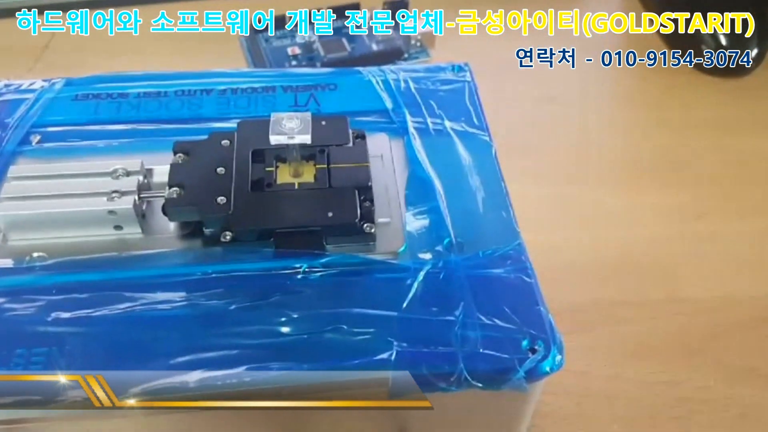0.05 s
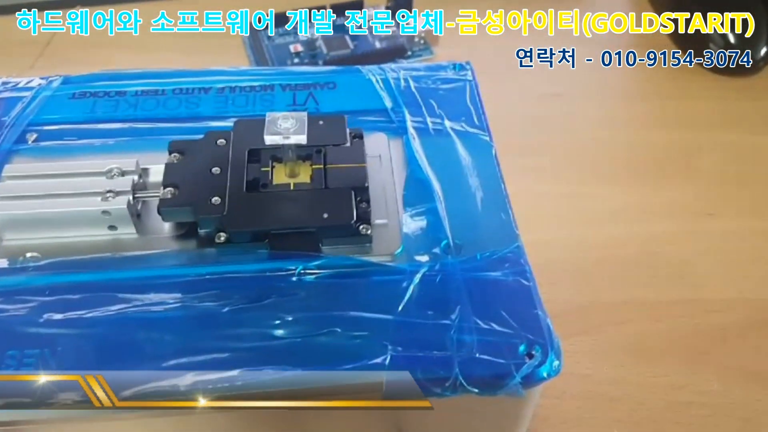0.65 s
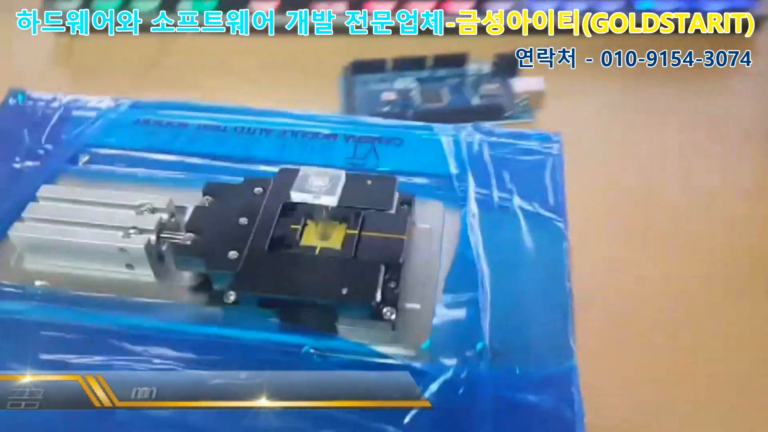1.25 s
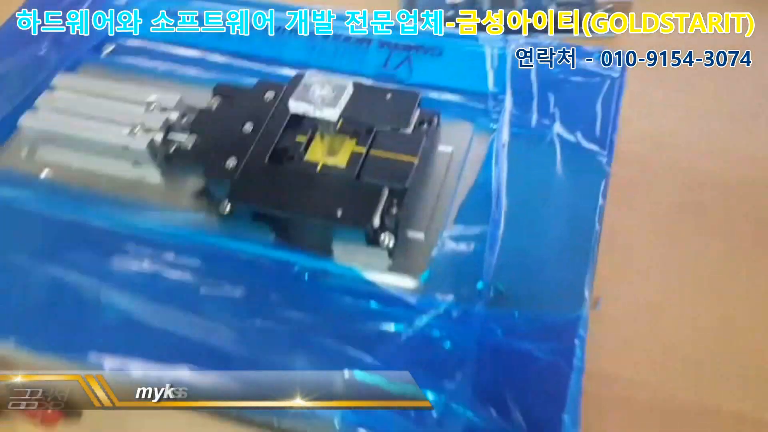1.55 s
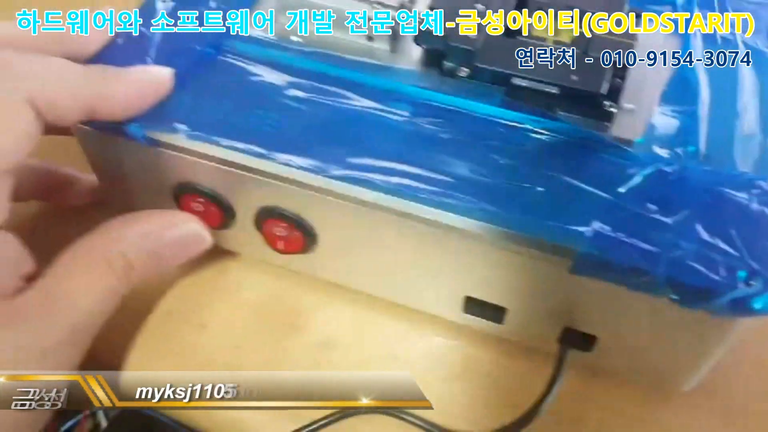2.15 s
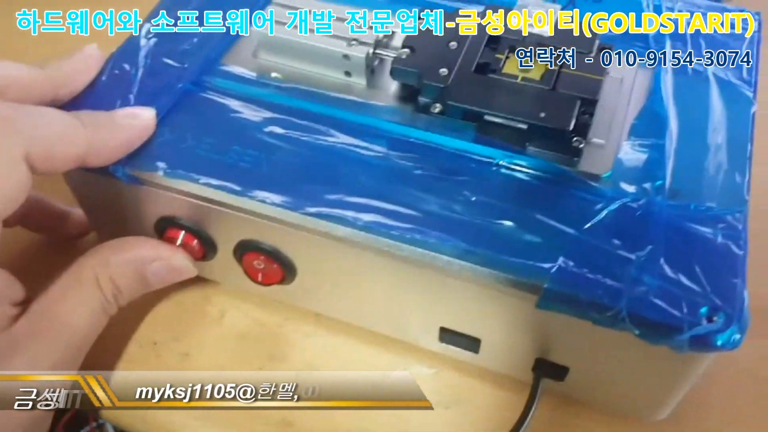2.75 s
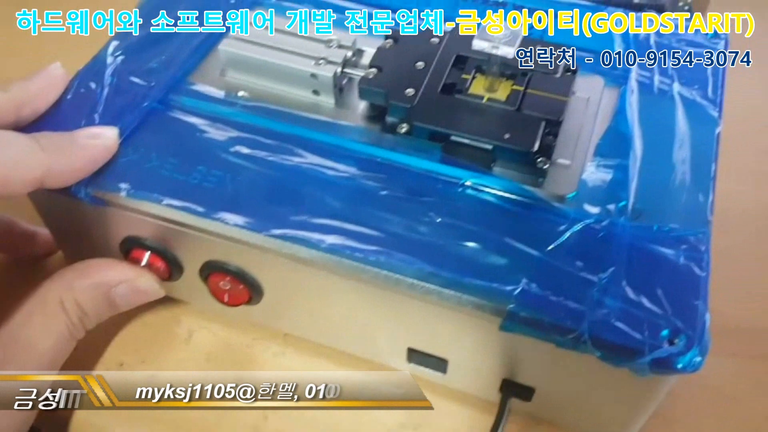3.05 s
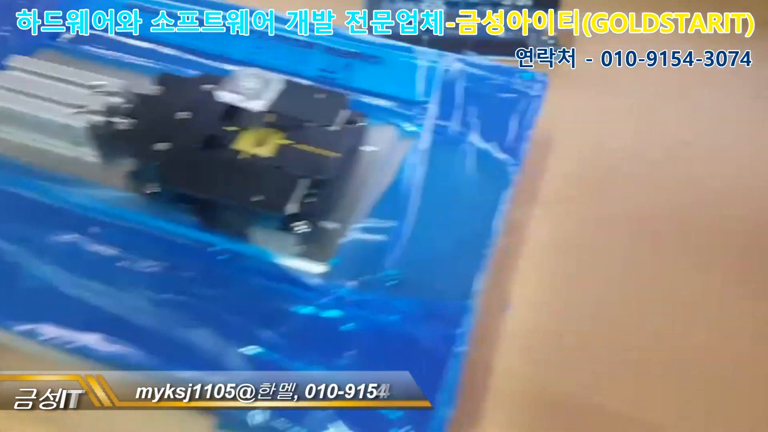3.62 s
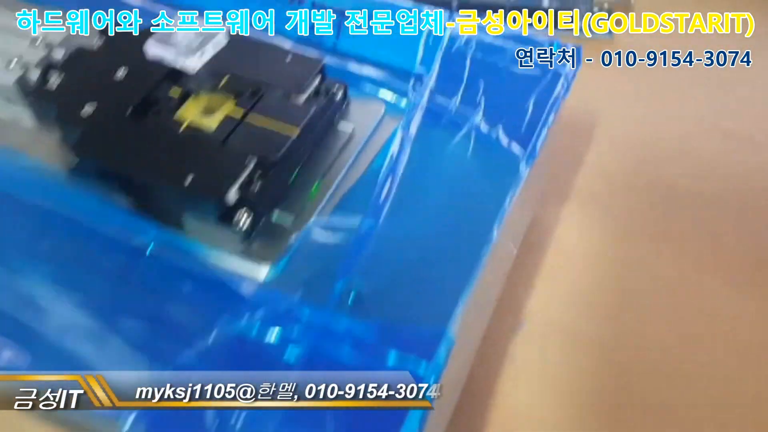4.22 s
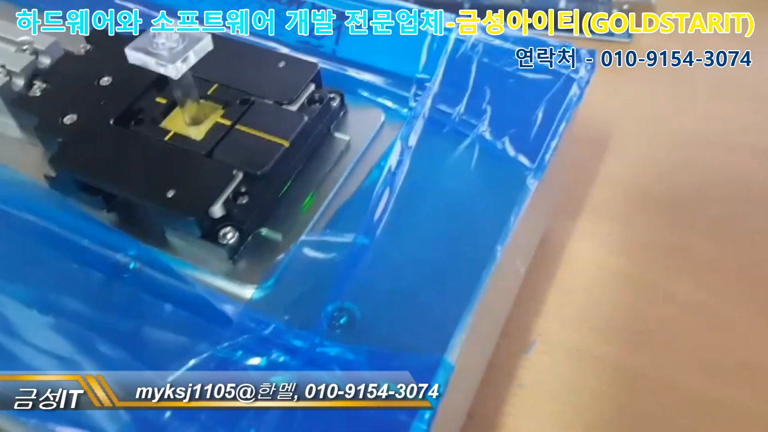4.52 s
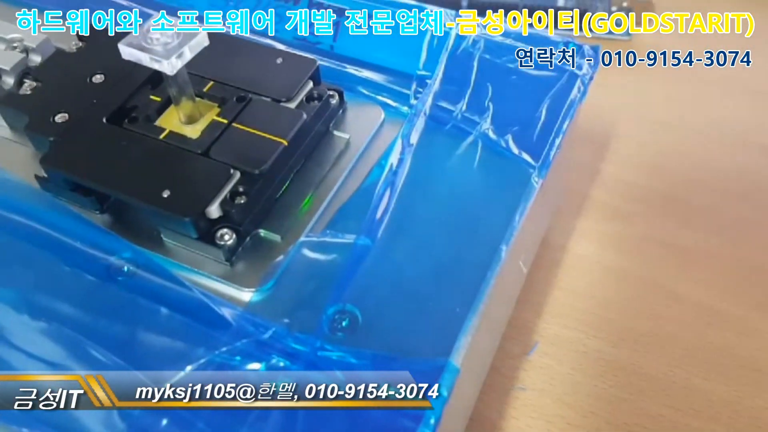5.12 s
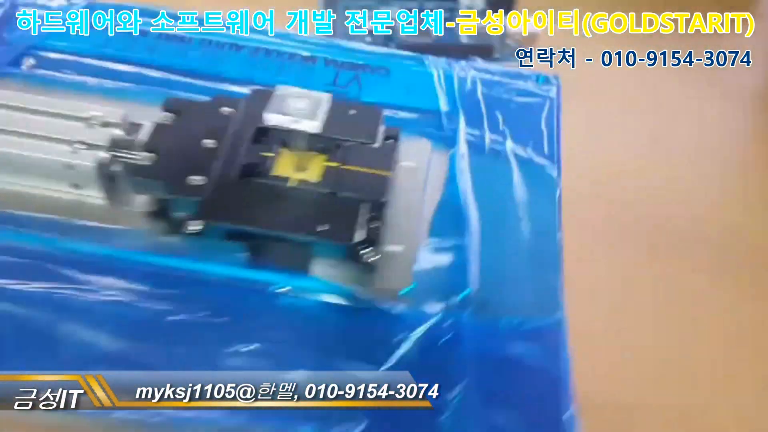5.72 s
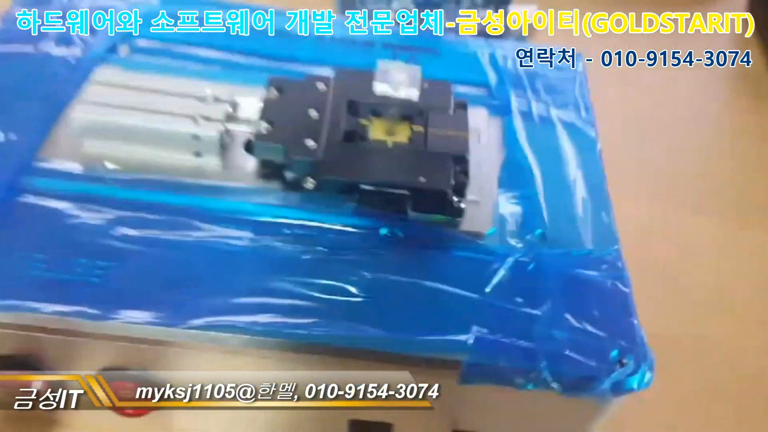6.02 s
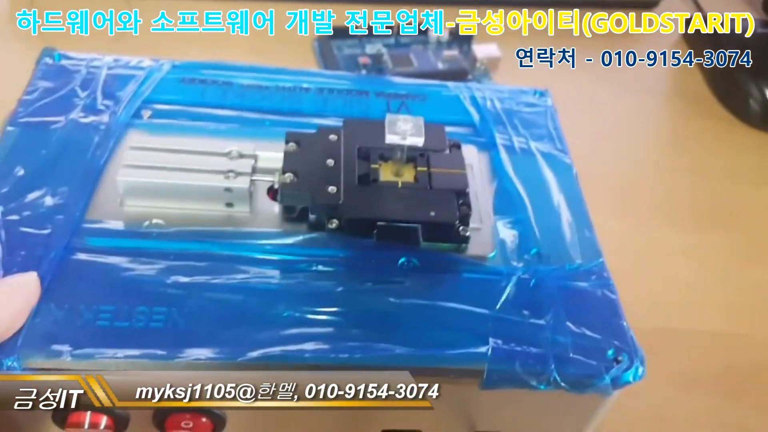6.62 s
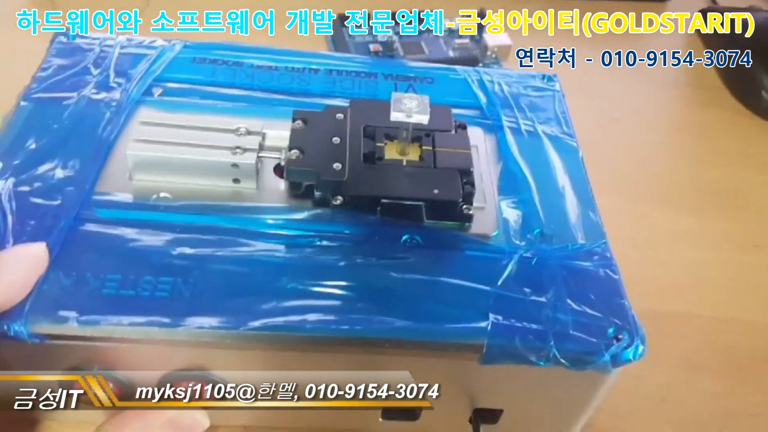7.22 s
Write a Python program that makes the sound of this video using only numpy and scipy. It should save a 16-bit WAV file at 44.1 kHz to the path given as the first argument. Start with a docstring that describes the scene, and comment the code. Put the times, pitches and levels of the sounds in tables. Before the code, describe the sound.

In a small, dry workroom with faint ventilation rumble, a machine's metal slide hits its stop three times, each a loud, close clack a few seconds apart. Between the first two, a more distant chair rasps and groans across the floor. Before the last, the chair jerks and bumps again, plastic film snaps and crinkles under a hand nearby, and the casters roll briefly to a stop.

```python
"""A sharp metallic clack, close by: an air cylinder on a small test jig slams its slide against the stop,
three times in all, and the metal rings. Between the strokes, further off, something like a chair is
dragged in rasping, groaning stick-slip jerks and then rolls on its casters. A sleeve brushes softly,
and plastic film buckles and crinkles under a hand. The workroom is small and dry, with a low
ventilation rumble."""
import sys
import numpy as np
from scipy import signal
from scipy.fft import rfft, irfft
from scipy.io import wavfile
from scipy.ndimage import uniform_filter1d

SR = 44100
rng = np.random.default_rng(int(sys.argv[2]) if len(sys.argv) > 2 else 0)


def transcribe(signal):
    """Save signal, clipped to [-1, 1], as a 16-bit WAV file at the path in sys.argv[1]."""
    frames = np.atleast_2d(signal).T
    limited = np.clip(frames, -1, 1)
    pcm = np.round(limited * 32767).astype(np.int16)
    wavfile.write(sys.argv[1], SR, pcm)


N = 328986

# how fast the chair's foot sticks and slips: (time [s], slip rate [1/s])
SLIP_RATE = [(1.78, 75), (1.85, 78), (1.91, 72), (1.97, 77.5), (2.05, 73.5), (2.1, 77), (3.8, 77),
             (3.9, 74), (3.95, 77)]


def slide_impacts(crack_db=-14, crack_t60=0.0066, rattle_db=-35, rattle_t60=0.087, rise_s=0.00054):
    """Impact excitation: the slide hits its stop and rebounds once; modes ring and loose parts chatter."""
    # strokes: (time [s], force [dB], rebound delay [s], rebound level [dB], off-centre seating [0-1],
    # crack level [dB], shelf above 9 kHz [dB], left minus right [dB])
    strokes = [(0.2299, 0.5, .0032, -9, 0.06, 6, -8, -0.5), (2.9251, 0, 0.0046, -6, 0.12, 3.5, 7.5, 0.5),
               (7.1394, 1, 0.001026, 3, 1, 1, 2, -0.5)]
    # modes of slide and case: (frequency [Hz], t60 [s], level seated squarely [dB], off centre [dB])
    jig_modes = [(140, 0.036, -38, -47.5), (225.8, 0.022, -36.5, -35.5), (329, 0.043, -32, -40),
                 (1225.5, 0.074, -32.5, -25), (1785, 0.051, -37, -32.5), (2344, 0.17, -30.5, -32),
                 (2420, 0.062, -29, -22.5), (2810, 0.023, -31.5, -23.5), (3145, .035, -21, -33),
                 (3270, .055, -17.5, -25.5), (3685, 0.021, -28, -23), (4015, .025, -17, -17.5),
                 (4108, 0.061, -16.5, -20.5), (4180, 0.021, -23, -14.5), (4830, 0.018, -13.5, -29),
                 (5523, 0.022, -10.5, -22.5), (5467, .045, -25, -34.5), (5900, 0.15, -31, -22),
                 (5840, 0.011, -20.5, -18.5), (7376, 0.034, -16, -31), (7860, 0.031, -12.5, -18.5),
                 (8623, 0.03, -21.5, -27)]
    # the metallic crack as picked up, dulled above 9 kHz by the microphone: (frequency [Hz], level [dB])
    crack_spectrum = [(25, -40), (70, -12.5), (300, -8), (600, -27.5), (1000, -16.5), (2200, -6),
                      (4500, -2.5), (6500, 3), (8400, -3.5), (9500, -21.5), (12500, -12.5), (16000, -20.5)]
    t, out = np.arange(SR // 2) / SR, np.zeros((2, N))
    hz, t60, square_db, skew_db = np.transpose(jig_modes)[:, :, None]
    for start, force_db, delay, rebound_db, skew, hard_db, sizzle_db, pan_db in strokes:
        gain = amp(force_db) * pan(pan_db)
        modes = amp((1 - skew) * square_db + skew * skew_db) * dying(t, t60)
        # each mode radiates from its own spot: above 1 kHz the channels are about a quarter cycle apart
        apart = np.pi / 2 * np.minimum(hz / 1000, 1) * rng.choice([-1, 1], hz.shape)
        apart *= rng.uniform(.7, 1.3, hz.shape)
        phase = rng.uniform(0, 2 * np.pi, hz.shape) + np.array([apart, -apart]) / 2
        ring = (modes * np.sin(2 * np.pi * hz * t + phase)).sum(1)
        add(out, start, gain * ring * (1 - np.exp(-t / rise_s)))
        force = amp(crack_db) * dying(t, crack_t60) + amp(rattle_db) * dying(t, rattle_t60)
        for at, blow_db in ((start, hard_db), (start + delay, hard_db + rebound_db)):
            burst = force * diffuse(rng.standard_normal((2, len(t))))
            crack = colour(burst, lambda f: curve(crack_spectrum, f) + sizzle_db * shelf(f, 8500))
            add(out, at, gain * amp(blow_db) * crack)
    return out + amp(-8.5) * room(out, gap_s=0.0063)


def chair_scrapes(slip_tilt_db=0.44, sag_db_per_s=13.5):
    """Stick-slip friction: slip pulses and grit shake the chair's frame, heard mostly through the room."""
    # the foot breaks loose: (time [s], length [s], level [dB], tilt [dB/octave])
    jerks = [(1.547, 0.017, -44, 0), (1.778, 0.021, -43.5, 0), (3.716, 0.027, -32.5, 3.5),
             (4.252, 0.019, -36.5, 4), (4.31, 0.017, -39.5, 3.5), (4.367, 0.033, -43, 5),
             (4.415, 0.033, -47.5, 3.7), (4.453, 0.022, -47, 3), (4.494, 0.028, -49.5, 3),
             (4.557, 0.011, -41, 2), (5.499, 0.0074, -31.5, 2.5)]
    # the foot slides steadily: (time [s], length [s], level [dB], roughness [0-1], tilt [dB/octave])
    drags = [(1.782, 0.32, -40.5, 0.33, -0.5), (2.086, 0.1, -42, 0.45, 1.4), (3.748, 0.38, -42.5, 0.6, 0.4)]
    t, out = np.arange(SR) / SR, np.zeros((2, N))
    jitter = .012 * unit(uniform_filter1d(rng.standard_normal(N), size=300))
    rate = np.interp(np.arange(N) / SR, *np.transpose(SLIP_RATE)) * (1 + jitter)
    slips = np.diff(np.floor(np.cumsum(rate) / SR), prepend=0)
    # bending waves disperse in the frame, so each slip arrives smeared over several ms
    lag_s = .011 * (1 - np.sqrt(np.fft.rfftfreq(N)[::-1] * 2))
    lag_s += .004 * np.sin(np.fft.rfftfreq(N, 1 / SR) / 130)
    slips = unit(irfft(rfft(slips) * np.exp(-2j * np.pi * np.cumsum(lag_s) * SR / N), N))
    grit = grains(per_s=3500, spread_db=5.0)

    def rub(start, push, rough, tilt_db):
        pulses, dust = (x[round(start * SR):][:len(t)] * push for x in (slips, grit))
        buzz = colour(pulses, lambda f: chair_tone(f, tilt_db + slip_tilt_db))
        rasp = colour(dust, lambda f: chair_tone(f, tilt_db))
        return np.sqrt(1 - rough) * buzz + np.sqrt(rough) * rasp
    for start, length, db, tilt_db in jerks:
        push = amp(db) * envelope(t, rise=0.0068, length=length, t60=0.048)
        add(out, start, rub(start, push, rough=0.71, tilt_db=tilt_db))
    for start, length, db, rough, tilt_db in drags:
        push = amp(db - sag_db_per_s * t) * envelope(t, rise=0.017, length=length, t60=0.12)
        add(out, start, rub(start, push, rough, tilt_db))
    return amp(-7) * out + amp(-1) * room(out)


def chair_groans(level_db=-46.5):
    """Mode locking: a clean tone glides with a multiple of the dragged foot's slip rate."""
    # locked tones: (start [s], end [s], relative level [dB], harmonic number)
    groans = [(1.82, 1.93, -3, 4), (1.94, 2.06, -1, 6), (1.93, 2.06, 0, 15), (2.08, 2.21, -5, 21),
              (3.76, 3.89, -8, 15)]
    out = np.zeros((2, N))
    cycles = np.cumsum(np.interp(np.arange(N) / SR, *np.transpose(SLIP_RATE))) / SR
    for start, end, db, harmonic in groans:
        tone = np.sin(2 * np.pi * harmonic * cycles[round(start * SR):round(end * SR)])
        add(out, start, amp(level_db + db) * tone * signal.windows.tukey(len(tone), .5))
    return out + amp(-5) * room(out)


def casters_and_knocks(shove_s=6.01, roll_db=-43):
    """Forced vibration: rolling casters and bumps shake the frame; case and bench take a few dull knocks."""
    # bumps of feet and casters: (time [s], level [dB])
    bumps = [(3.931, -43.5), (4.122, -45.5), (4.26, -40), (4.318, -38.5), (4.38, -38), (4.427, -37),
             (4.462, -44), (4.498, -40.5), (5.978, -44.5), (6.033, -41), (6.187, -40.5), (6.249, -38),
             (6.318, -40.5), (6.486, -48)]
    # soft knocks on case and bench: (time [s], level [dB], centre frequency [Hz], t60 [s])
    knocks = [(0.643, -50, 80.6, 0.043), (5.46, -35.5, 300, 0.039), (5.8336, -30, 900, 0.0088),
              (6.878, -41, 1110, 0.023)]
    # after one shove the casters pick up speed, run and coast to a stop
    speed = amp(roll_db) * envelope(np.arange(N) / SR - shove_s, rise=0.031, length=0.13, t60=0.4)
    floor = grains(per_s=1700, spread_db=2.5) * speed
    out = colour(floor, lambda f: chair_tone(f, tilt_db=-3) + low_cut(f, 150))
    t = np.arange(SR // 3) / SR

    def blow(db, t60):
        return amp(db) * rng.standard_normal(len(t)) * envelope(t, rise=0.0024, length=0, t60=t60)
    for start, db in bumps:
        bump = colour(blow(db, t60=0.11), lambda f: chair_tone(f, tilt_db=-1) + hump(f, 520, 1.4))
        add(out, start, bump)
    for start, db, centre_hz, t60 in knocks:
        add(out, start, colour(blow(db, t60), lambda f: hump(f, centre_hz, octaves=0.38)))
    return amp(-8) * out + amp(-1) * room(out)


def chair_tone(hz, tilt_db):
    """The chair's rasp as picked up, in dB: frame resonances, plus the microphone's peak and dull top."""
    # frame resonances and the microphone's 8 kHz peak: (frequency [Hz], width [Hz], height [dB])
    tone_peaks = [(305, 36, 16), (443, 68, 6.5), (802, 78, 7), (1137, 205, 5), (1700, 260, -2.5),
                  (2200, 140, -1.5), (2825, 270, 0), (5040, 270, -4), (8070, 610, 6.5)]
    # broad slope of the rasp, dulled above 9 kHz by the microphone: (frequency [Hz], level [dB])
    slope = [(70, -29.5), (140, -2), (200, -3), (300, -6), (600, -1.5), (1300, -5), (2500, -2), (4500, -6),
             (6500, -12), (8600, -18.5), (10000, -32.5), (12000, -26.5), (16000, -43)]
    peaks = sum(amp(db) / (1 + (2 * (hz - centre) / width) ** 2) for centre, width, db in tone_peaks)
    return curve(slope, hz) + 20 * np.log10(1 + peaks) + tilt_db * np.log2(hz + 1)


def plastic_film(snap_db=-6, crease_db=-7.5, crinkle_hz=6500):
    """Buckling: film gives way in short snaps with fine crinkle between; the lid under it rings a little."""
    # loudest snaps: (time [s], relative level [dB], centre frequency [Hz], t60 [s])
    snaps = [(1.074, -40.5, 6900, 0.0072), (1.349, -39.5, 8700, 0.01), (5.156, -46.5, 8500, .005),
             (5.622, -36, 7660, .015), (5.704, -31.5, 9100, .028), (5.7315, -27, 7240, 0.049),
             (5.7583, -24.5, 5960, 0.025), (5.7743, -32, 4070, 0.082), (5.7917, -27.5, 5030, 0.036),
             (5.8358, -22.5, 4960, 0.0094), (5.89, -31, 6700, 0.0087), (5.915, -36, 6900, .03),
             (5.955, -36.5, 7100, 0.027), (5.997, -31, 7000, 0.029), (6.078, -24, 7000, 0.011),
             (6.259, -37.5, 7500, 0.011)]
    # presses of the hand, each swelling and letting go: (time [s], length [s], level [dB])
    presses = [(5.5, 0.015, -46.5), (5.563, 0.076, -63), (5.675, 0.068, -49.5), (5.838, .14, -53),
               (6.045, 0.093, -54), (6.233, 0.084, -63)]
    t, out = np.arange(SR // 12) / SR, np.zeros((2, N))

    def sheet(f, centre_hz):
        film = hump(f, centre_hz, octaves=0.75) + low_cut(f, 0.47 * centre_hz) - 4 * shelf(f, 8800)
        lid = hump(f, 1400, octaves=1.0) - 13
        return np.maximum(film, lid)
    for start, db, centre_hz, t60 in snaps:
        burst = diffuse(rng.standard_normal((2, len(t)))) * dying(t, t60)
        add(out, start, amp(db + snap_db) * colour(burst, lambda f: sheet(f, centre_hz)))
    pressure = sum(amp(db) * envelope(np.arange(N) / SR - start, length, length, t60=0.39)
                   for start, length, db in presses)
    creases = amp(crease_db) * grains(per_s=90, spread_db=4.5)
    crinkle = np.array([grains(per_s=1000, spread_db=-1.0) for _ in range(2)])
    out += colour((crinkle + creases) * pressure, lambda f: sheet(f, crinkle_hz))
    return (out + amp(-10) * room(out)) * pan(-2)


def sleeve(start_s=1.113, level_db=-63):
    """Friction noise: countless cloth fibres catch and let go as a hand reaches over."""
    # the soft swish as picked up, dulled above 9 kHz by the microphone: (frequency [Hz], level [dB])
    swish_spectrum = [(150, -2), (700, 2.5), (1600, 3.5), (4000, -4.5), (8500, -6), (10500, -18),
                      (16000, -15)]
    fibres = np.array([grains(per_s=5300, spread_db=2.5) for _ in range(2)])
    reach = amp(level_db) * envelope(np.arange(N) / SR - start_s, rise=0.082, length=0.544, t60=1)
    return colour(diffuse(fibres) * reach, lambda f: curve(swish_spectrum, f))


def ventilation(air_db=-61.5, duct_hz=277, duct_width_hz=14, duct_db=-68):
    """Duct resonance: one narrow band drones over a steady broadband rumble."""
    # spectrum of the rumble: (frequency [Hz], level [dB])
    air_spectrum = [(15, -51.5), (25, -26.5), (59, -3), (92, -14), (127, -0.5), (249, -8), (277, -9),
                    (363, -8), (427, -20), (476, -10.5), (545, -18), (1230, -20.5), (1400, -20.5),
                    (14800, -40), (16000, -38)]
    air = colour(diffuse(rng.standard_normal((2, N))), lambda f: curve(air_spectrum, f))
    drone = colour(rng.standard_normal(N),
                   lambda f: -20 * np.log10(1 + ((f - duct_hz) / duct_width_hz) ** 2))
    return amp(air_db) * air + amp(duct_db) * drone


def room(x, gap_s=0.0019):
    """Reverberation: dense reflections fade in after a short gap, each band dying at its own rate."""
    # reverberation time: (frequency [Hz], t60 [s])
    decay_times = [(100, 1), (400, 0.18), (1200, 0.35), (3000, 0.29), (7000, 0.24), (14000, 0.23)]
    hz, t, bands = signal.stft(diffuse(rng.standard_normal((2, 24000))), SR, nperseg=256)
    tail = signal.istft(bands * dying(t, curve(decay_times, hz)[:, None]), SR, nperseg=256)[1]
    tail *= np.clip(np.arange(tail.shape[1]) / (gap_s * SR) - .5, 0, 1)
    return signal.fftconvolve(x, tail / np.linalg.norm(tail, axis=1, keepdims=True), axes=1)[:, :N]


def diffuse(pair):
    """Diffuse-field coherence: two unrelated channels become alike in the bass, as at two close points."""
    # likeness of left and right: (frequency [Hz], correlation [0-1])
    coherence = [(100, 0.93), (300, 0.89), (640, 0.49), (1400, 0.084), (5000, 0.01)]
    left, right = rfft(pair)
    same = curve(coherence, np.fft.rfftfreq(pair.shape[1], 1 / SR))
    return irfft(np.array([left, same * left + np.sqrt(1 - same ** 2) * right]), pair.shape[1])


def grains(per_s, spread_db):
    """Shot noise: random clicks of uneven size, at unit RMS."""
    size = amp(spread_db * np.minimum(rng.exponential(1, N), 4))
    return unit(rng.standard_normal(N) * size * (rng.random(N) < per_s / SR))


def colour(x, db_at):
    """Minimum-phase filter of unit energy, its spectrum shaped as db_at(Hz)."""
    db = db_at(abs(np.fft.fftfreq(4096, 1 / SR)))
    log_gain = np.log(amp(np.maximum(db, db.max() - 80)))
    taps = np.fft.ifft(np.exp(np.conj(signal.hilbert(log_gain)))).real
    taps /= np.linalg.norm(taps)
    return signal.fftconvolve(np.atleast_2d(x), taps[None], axes=1)[:, :x.shape[-1]]


def curve(points, hz):
    """Linear interpolation over log frequency."""
    f, value = np.transpose(points)
    return np.interp(np.log(hz + 1), np.log(f + 1), value)


def hump(hz, centre_hz, octaves):
    """A broad resonance, in dB."""
    return -20 * np.log10(1 + (np.log2((hz + 1) / centre_hz) / octaves) ** 2 / 2)


def low_cut(hz, edge_hz):
    """Third-order high-pass response, in dB."""
    return -10 * np.log10(1 + (edge_hz / (hz + 1)) ** 6)


def shelf(hz, edge_hz):
    """Ramp from 0 to 1 over the kilohertz above the edge."""
    return np.clip((hz - edge_hz) / 1000, 0, 1)


def envelope(t, rise, length, t60):
    """Linear rise from t = 0, a hold until length, then exponential decay; all in seconds."""
    return np.clip(t / rise, 0, 1) * dying(np.clip(t - length, 0, 2 * t60), t60)


def dying(t, t60):
    """Exponential damping: 60 dB down after t60."""
    return np.exp(-np.log(1000) * t / t60)


def amp(db):
    return 10 ** (np.asarray(db) / 20)


def pan(db):
    return amp([[db / 2], [-db / 2]])


def unit(x):
    return x / np.sqrt(np.mean(x ** 2) + 1e-20)


def add(mix, start_s, sound):
    part = mix[:, round(start_s * SR):][:, :sound.shape[-1]]
    part += sound[..., :part.shape[1]]


def scene():
    """Superposition of all sources, in stereo."""
    return (slide_impacts() + chair_scrapes() + chair_groans() + casters_and_knocks()
            + plastic_film() + sleeve() + ventilation())


def record(dry):
    """Soft saturation rounds peaks near full scale; a low-pass filter then limits the band."""
    low_pass = signal.firwin(255, 15900, window=("kaiser", 9), fs=SR)
    return signal.oaconvolve(np.tanh(dry), low_pass[None], "same")


dry = scene()
out = record(dry)
transcribe(out)
```